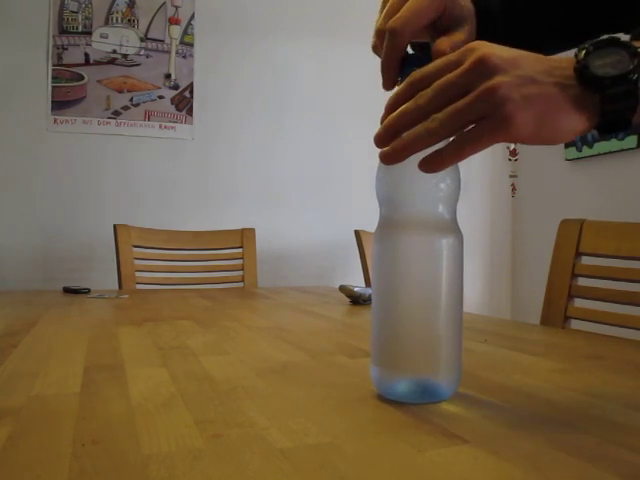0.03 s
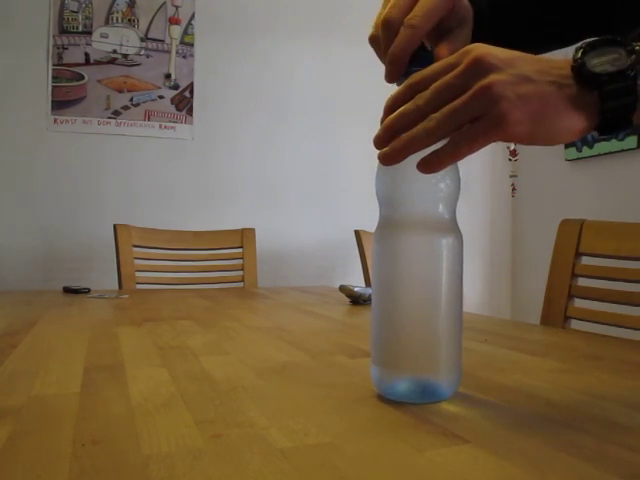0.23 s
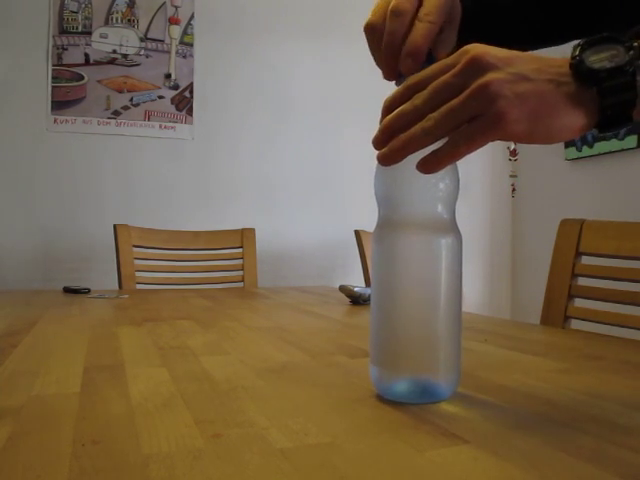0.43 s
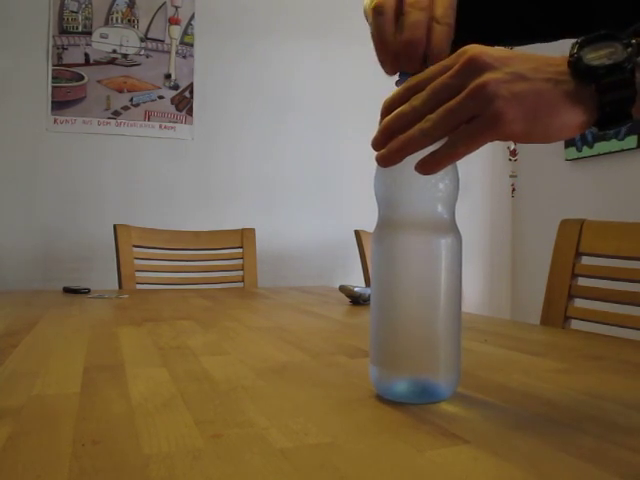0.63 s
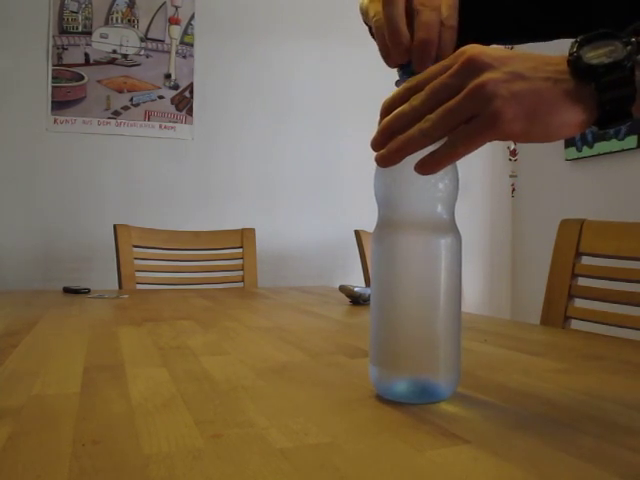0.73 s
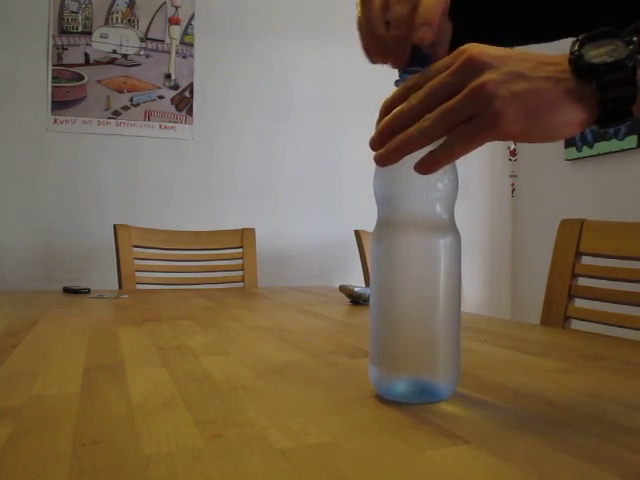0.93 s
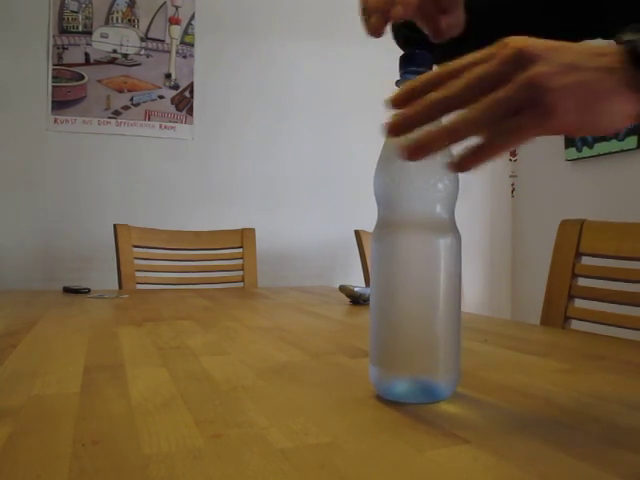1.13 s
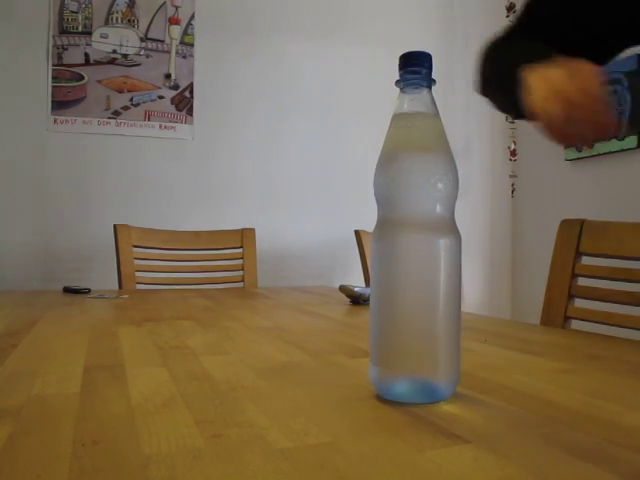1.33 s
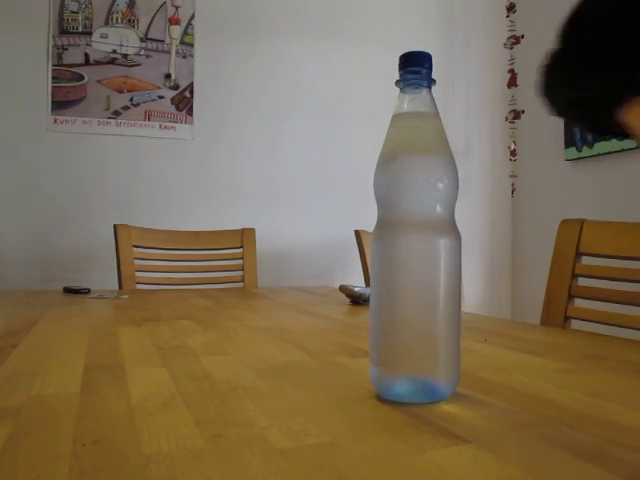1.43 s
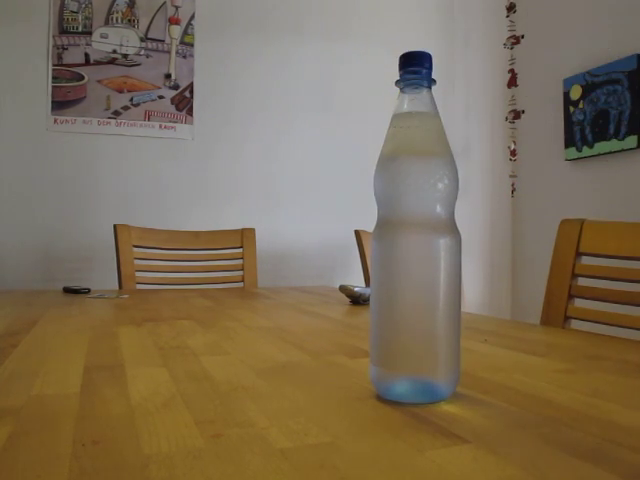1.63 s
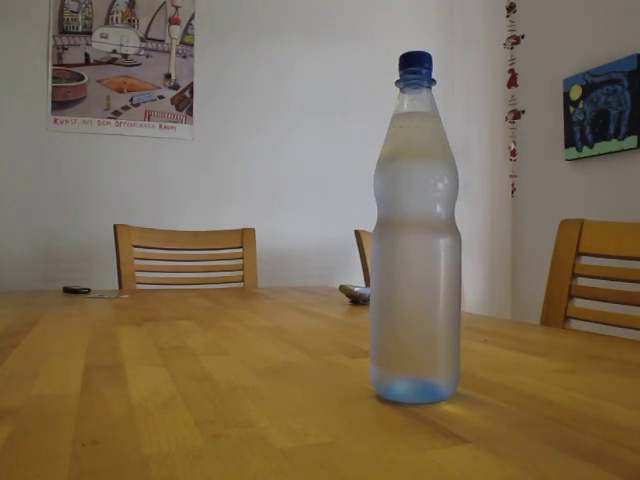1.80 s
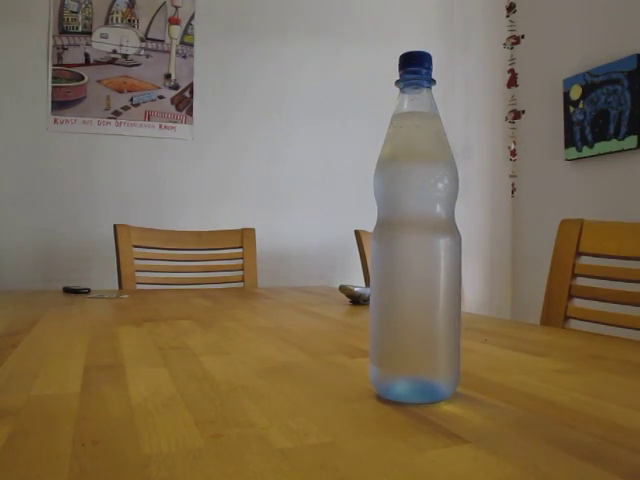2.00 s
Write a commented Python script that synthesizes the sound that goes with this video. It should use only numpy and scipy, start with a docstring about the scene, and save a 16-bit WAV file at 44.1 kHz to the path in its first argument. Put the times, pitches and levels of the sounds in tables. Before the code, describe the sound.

Close microphone in a small, hard room: soft booms on a wooden table, two crisp plastic cap cracks with short gas spits, faint skin and sleeve rubbing, then light ticks and dull thuds as someone moves off.

```python
"""Soft booms come first, over a low background: hands push a bottle of fizzy water against a wooden table.
Its plastic screw cap then snaps twice, each time with a short spit of gas. Sleeves rustle and skin rubs,
and the person moves off with one hard knock, three duller thuds and a few ticks, all in a small, bare room.
Clicks set resonances ringing for the hard sounds; shaped noise makes the gas, the cloth and the air."""
import sys
import numpy as np
from scipy import signal
from scipy.fft import rfft, irfft
from scipy.io import wavfile

SR = 44100
rng = np.random.default_rng(int(sys.argv[2]) if len(sys.argv) > 2 else 0)


def dump_mix(stems):
    """Bounce the given channels to the path in sys.argv[1] as a 16-bit WAV at rate SR."""
    frames = np.atleast_2d(stems).T  # one column per channel
    limited = np.clip(frames, -1, 1)  # hard clip at full scale
    pcm = np.round(limited * 32767).astype(np.int16)
    wavfile.write(sys.argv[1], SR, pcm)


N = 90934  # length in samples, about 2.06 seconds


def from_db(db):
    """Turn decibels into a gain."""
    return 10 ** (np.asarray(db) / 20)


def seconds():
    """Give the time of every sample."""
    return np.arange(N) / SR


def level(points):
    """Follow a curve of (seconds, dB) and return it as a gain."""
    return from_db(np.interp(seconds(), *np.transpose(points)))


def at_hz(points, hz):
    """Read a table between its rows, with frequency on a logarithmic axis."""
    table_hz, value = np.transpose(points)
    return np.interp(np.log(np.maximum(hz, 1)), np.log(table_hz), value)


def noise(spectrum):
    """Colour white noise with a spectrum, then scale it to an rms of 1."""
    hz = np.fft.rfftfreq(N, 1 / SR)
    white = rfft(rng.standard_normal(N))
    coloured = irfft(white * from_db(at_hz(spectrum, hz)), N)
    return coloured / coloured.std()


def clicks(rows):
    """Place one single-sample click for each row of (seconds, dB, ..)."""
    out = np.zeros(N)
    for start, db, *_ in rows:
        out[int(np.clip(start * SR, 0, N - 1))] += from_db(db)
    return out


def decay_rate(t60):
    """Give the rate per second of a fade that drops 60 dB in t60 seconds."""
    return np.log(1000) / t60


def ring(force, hz, t60):
    """One resonance: a click of height 1 starts a dying sine of height 1."""
    radius = np.exp(-decay_rate(t60) / SR)  # what is left after each sample
    angle = 2 * np.pi * hz / SR
    feedback = [1, -2 * radius * np.cos(angle), radius * radius]
    return signal.lfilter([0, np.sin(angle)], feedback, force + 1e-18)


def body(force, modes):
    """A solid object rings at several resonances at once, added with alternating signs."""
    out = 0
    for k, (hz, db, t60) in enumerate(modes):
        out = out + (-1) ** k * from_db(db) * ring(force, hz, t60)
    return out


def soften(x, hz):
    """A soft contact pushes more slowly than a hard one, so its treble is cut above hz."""
    lowpass = signal.butter(2, min(hz, .45 * SR), fs=SR, output="sos")
    return signal.sosfilt(lowpass, x + 1e-18)


def stroke(middle, half, db):
    """A smooth swell and fade in level."""
    return from_db(db) * np.exp(-.5 * ((seconds() - middle) / half) ** 2)


# Three layers of background: a steady one, a rumble of stirred air, and a slow sway of air.
# Each row of a LEVEL table: time in seconds, level in dB.
# Each row of a COLOUR table: frequency in Hz, relative strength in dB per Hz.
STEADY_LEVEL = [(0, -52.5), (.4, -54), (.6, -56), (1.0, -56.5), (1.4, -56.5), (2.06, -54)]
STEADY_COLOUR = [(25, 0), (48, -0.5), (75, -16), (130, -8.5), (200, -11.5), (300, -20), (500, -21.5),
                 (850, -25), (1400, -26.5), (2800, -27), (6000, -30.5), (9300, -36.5), (12500, -40),
                 (16000, -51)]
RUMBLE_LEVEL = [(0, -74), (.38, -54), (.47, -43), (.7, -47.5), (.9, -54.5), (1.2, -52), (1.45, -62),
                (1.68, -49.5), (1.76, -46.5), (1.95, -48), (2.06, -51)]
RUMBLE_COLOUR = [(20, -6), (35, -8), (50, 5.5), (68, -13), (120, -21), (250, -20.5), (700, -45),
                 (4000, -77)]
SWAY_LEVEL = [(0, -58), (1.45, -58.5), (1.66, -47.5), (1.75, -38), (2.06, -39.5)]
SWAY_COLOUR = [(5, -10.5), (10, -1.5), (20, -10), (40, -26.5), (150, -69.5), (1000, -110)]


def background():
    """Three coloured noises, each following its own level; the sway grows as the person moves off."""
    steady = level(STEADY_LEVEL) * noise(STEADY_COLOUR)
    rumble = level(RUMBLE_LEVEL) * noise(RUMBLE_COLOUR)
    sway = level(SWAY_LEVEL) * noise(SWAY_COLOUR)
    return steady + rumble + sway


# Hands push the bottle against the table. Each row: start in seconds, level in dB.
TABLE_PUSHES = [(.002, -39.5), (.018, -44.5), (.075, -49.5), (.098, -43), (.140, -39.5), (.172, -35.5),
                (.205, -61), (.365, -42.5), (.437, -34.5), (.484, -43.5), (.643, -37), (1.03, -45.5),
                (1.056, -37), (1.071, -37.5), (1.112, -45.5), (1.128, -45.5), (1.22, -63)]
# Resonances of the table top. Each row: frequency in Hz, level in dB, time to fade by 60 dB in seconds.
TABLE_MODES = [(49.83, -10, 0.73), (98.4, -4.5, 0.14), (126.6, -4.5, 0.26), (148.2, -3.5, 0.27),
               (174.7, -9.5, 0.18), (224.2, -18, .06), (285.8, -12.5, 0.11), (370, -18, .1)]
PUSH_SOFTNESS_HZ = 493


def table():
    """Soft pushes set the table top booming at its own low resonances."""
    return body(soften(clicks(TABLE_PUSHES), PUSH_SOFTNESS_HZ), TABLE_MODES)


# Rustle of the moving body. Each row: time in seconds, level in dB.
RUSTLE_LEVEL = [(0, -61), (.2, -67), (.32, -61.5), (.40, -60), (.55, -69), (.8, -63), (.98, -72.5),
                (1.4, -61), (1.58, -60.5), (1.68, -53), (1.84, -50), (1.95, -53.5), (2.06, -58)]
# Its colour. Each row: frequency in Hz, relative strength in dB per Hz.
RUSTLE_COLOUR = [(150, -8), (400, 3), (900, 1), (1900, -2), (3500, -6), (6500, -10.5), (9300, -4.5),
                 (12500, -17), (16000, -27.5)]
# Sleeves brush. Each row: middle in seconds, half length in seconds, level in dB.
SLEEVE_STROKES = [(0.163, 0.016, -60.5), (0.262, 0.036, -56), (1.274, 0.052, -59.5), (1.57, 0.025, -59.5),
                  (1.885, 0.046, -57)]
# Their colour. Each row: frequency in Hz, relative strength in dB per Hz.
SLEEVE_COLOUR = [(1500, -27), (3000, -11), (5000, -14), (8000, -6), (10000, -8.5), (12500, -21),
                 (16000, -31)]


def clothes():
    """Cloth friction is noise: bright sleeve strokes over a duller rustle, both fluttering in level."""
    sleeves = sum(stroke(*row) for row in SLEEVE_STROKES) * noise(SLEEVE_COLOUR)
    rustle = level(RUSTLE_LEVEL) * noise(RUSTLE_COLOUR)
    return (sleeves + rustle) * cloth_flutter()


FLUTTER_DB, FLUTTER_HZ = 1.5, 115  # typical size of the level changes, and their top speed


def cloth_flutter():
    """Cloth catches and slides: a quick random flutter of level, with an rms gain of 1."""
    wobble = soften(rng.standard_normal(N), FLUTTER_HZ)
    gain = from_db(FLUTTER_DB * wobble / wobble.std())
    return gain / np.sqrt(np.mean(gain ** 2))


# Skin and cloth rub, each in a narrow band.
# Each row: middle in seconds, half length in seconds, level in dB, band centre in Hz, band width in Hz.
RUBS = [(0.398, 0.019, -55, 442, 220), (0.702, 0.031, -55, 840, 700), (0.846, 0.042, -60.5, 1400, 1800),
        (0.866, 0.061, -59.5, 370, 320), (1.109, 0.04, -55, 328, 268), (1.262, .018, -65.5, 3000, 300),
        (1.511, 0.021, -58, 286, 110), (1.565, .045, -63, 1800, 190), (1.662, 0.023, -66, 2040, 404),
        (1.744, .016, -50.5, 1400, 2010), (1.899, 0.035, -55.5, 6480, 330)]


def rubs():
    """Friction makes noise, and each rub lets through one band of it."""
    out = 0
    for middle, half, db, hz, width in RUBS:
        edges = [max(hz - width / 2, 20), hz + width / 2]
        bandpass = signal.butter(2, edges, "band", fs=SR, output="sos")
        friction = signal.sosfilt(bandpass, rng.standard_normal(N))
        out = out + stroke(middle, half, db) * friction / friction.std()
    return out


# The cap snaps. Each row: start in seconds, level of the crack in dB, level of the gas in dB.
SNAPS = [(0.4365, 1.5, -30), (0.643, -11.5, -34.5)]
# Small slips of the cap round the snaps. Each row: start in seconds, level in dB.
SLIPS = [(.4340, -35), (.6418, -20.5), (.6447, -29), (.8715, -45.5)]
# Resonances of cap and neck. Each row: frequency in Hz, level in dB while tight,
# level in dB once loosened, time to fade by 60 dB in seconds.
CAP_MODES = [(730, -39, -19, 0.0036), (1968, -19, -21, 0.0073), (2730, -13, -12, 0.0032),
             (3450, -20.5, -13, 0.0027), (4275, -15.5, -8, 0.0087), (5470, 0.5, -5.5, 0.0043),
             (6220, -2.5, -3.5, 0.0051), (8170, -3.5, -7.5, 0.0025), (9910, 0.5, -10, 0.0031),
             (11500, -10, -9, 0.0051), (12200, -26, -12, 0.0058), (14960, -10, -18, 0.0016)]
LOOSE_FROM_S = .6


def cap():
    """The cap sticks and lets go with a crack, and its resonances are balanced differently once loose."""
    force = clicks(SNAPS) + clicks(SLIPS)
    loose = seconds() > LOOSE_FROM_S
    tight_modes = [(hz, tight_db, t60) for hz, tight_db, _, t60 in CAP_MODES]
    loose_modes = [(hz, loose_db, t60) for hz, _, loose_db, t60 in CAP_MODES]
    return body(force * ~loose, tight_modes) + body(force * loose, loose_modes)


# The bottle is jolted. Each row: start in seconds, level in dB.
JOLTS = [(.4365, -60.5), (.6435, -45)]
# Resonances of the bottle wall. Each row: frequency in Hz, level in dB, time to fade by 60 dB in seconds.
BOTTLE_MODES = [(415, -9.5, .13), (665, -1, .09), (790, -8, .1), (964, -2.5, 0.19), (1200, -6, .12),
                (2750, -8, 0.2), (3560, -7, .2), (5630, -4, .25), (5770, -1, 0.44)]


def bottle():
    """Two jolts set the bottle wall ringing faintly, for longer than the cap."""
    return body(clicks(JOLTS), BOTTLE_MODES)


# Colour of the escaping gas. Each row: frequency in Hz, relative strength in dB per Hz.
GAS_COLOUR = [(500, -5.5), (1000, -16), (1400, -12.5), (2200, -10), (3500, -8.5), (4700, -5.5), (5800, 0),
              (7000, -3.5), (9500, 1.5), (11500, -5.5), (13000, -16.5), (16000, -33)]
GAS_RISE_S, GAS_T60_S = 0.0017, 0.32  # time constant of the rise; time to fade by 60 dB


def gas():
    """Each snap lets out a spit of gas: noise that rises fast and dies with the pressure."""
    flow = 0
    for start, _, gas_db in SNAPS:
        age = np.maximum(seconds() - start, 0)
        rise = 1 - np.exp(-age / GAS_RISE_S)
        flow = flow + from_db(gas_db) * rise * np.exp(-decay_rate(GAS_T60_S) * age)
    return flow * noise(GAS_COLOUR)


# Light ticks of clothing.
# Each row: start in seconds, level in dB, pitch in Hz, time to fade by 60 dB in seconds.
TICKS = [(1.569, -43, 7100, 0.01), (1.7229, -32, 8300, 0.0023), (1.7368, -39.5, 9300, 0.018),
         (1.796, -42, 10000, 0.019), (1.816, -46, 4140, 0.014), (1.817, -43, 11000, 0.0018),
         (1.834, -40, 10200, .005), (1.836, -44, 7050, 0.011), (1.838, -36, 13000, .002),
         (1.839, -35.5, 3860, 0.0068), (1.8401, -33.5, 9500, 0.003)]


def ticks():
    """Tiny hard contacts, each ringing briefly at a pitch of its own."""
    return sum(ring(clicks([(start, db)]), hz, t60) for start, db, hz, t60 in TICKS)


# Knocks as the person moves off.
# Each row: start in seconds, level in dB, contact softness as a treble limit in Hz.
KNOCKS = [(1.7219, -42, 4460), (1.8428, -38, 446), (1.877, -39, 335), (1.906, -42.5, 283)]
# Resonances of the knocked wood. Each row: frequency in Hz, level in dB, time to fade by 60 dB in seconds.
WOOD_MODES = [(86.5, -15, 0.064), (131, -6.5, 0.14), (168, -9, 0.31), (200, -4, 0.11), (296.6, -4, 0.16),
              (334.4, -2.5, 0.11), (491, -10, 0.078), (608, 0, .08), (856, -1.5, 0.07), (1240, 1, 0.035),
              (1660, 5.5, 0.018), (2780, 8, 0.014)]


def knocks():
    """One hard knock on wood, then duller thuds, because softer contacts excite less treble."""
    force = sum(soften(clicks([(start, db)]), hz) for start, db, hz in KNOCKS)
    return body(force, WOOD_MODES)


# Colour of the reflections. Each row: frequency in Hz, level in dB against the direct sound.
ROOM_COLOUR = [(100, 7.5), (500, 8), (1000, -9), (2200, -9.5), (3500, -10), (5500, -20), (7000, -18.5),
               (9500, -17), (11500, -20), (13500, -25.5), (16000, -25)]
# How long they last. Each row: frequency in Hz, time to fade by 60 dB in seconds.
ROOM_T60 = [(100, 0.57), (700, 0.39), (2500, 0.44), (6000, 0.48), (10000, 0.23), (14000, 0.21)]
FIRST_WALL_S, BUILD_UP_S = 0.0013, 0.0046  # delay of the first reflection; time to reach full density


def room(x):
    """Walls return a blur of reflections that builds up quickly and dies away band by band."""
    t, hz = seconds(), np.fft.rfftfreq(N, 1 / SR)
    edges = np.geomspace(40, 18000, 28)  # band edges in Hz
    white = rfft(rng.standard_normal(N))
    build_up = np.clip((t - FIRST_WALL_S) / BUILD_UP_S, 0, 1)
    response = 0
    for low, high in zip(edges, edges[1:]):
        centre = np.sqrt(low * high)
        decay = build_up * np.exp(-decay_rate(at_hz(ROOM_T60, centre)) * t)
        band = irfft(white * ((hz >= low) & (hz < high)), N)
        gain = from_db(at_hz(ROOM_COLOUR, centre))
        response = response + band * decay / np.linalg.norm(decay) * gain
    return signal.fftconvolve(x, response)[:N]


TABLE_ROOM_DB, WOOD_ROOM_DB = -9, -2.5  # how much of each is sent into the room


def scene():
    """Add all sources, the reflections of the solid ones, and the background."""
    boom, wood = table(), knocks()
    near = cap() + bottle() + ticks()
    reflections = room(near + from_db(TABLE_ROOM_DB) * boom + from_db(WOOD_ROOM_DB) * wood)
    direct = near + boom + wood + gas() + clothes() + rubs()
    return (direct + reflections + background())[None]


CUTOFF_HZ = 16600


def record(dry):
    """Loud peaks are rounded off smoothly, then everything above the cutoff is removed."""
    top = .9  # the rounded peaks stay below this height
    rounded = top * np.tanh(dry / top)
    lowpass = signal.ellip(12, .2, 90, CUTOFF_HZ, fs=SR, output="sos")
    return signal.sosfilt(lowpass, rounded)


dry = scene()
out = record(dry)
dump_mix(out)
```